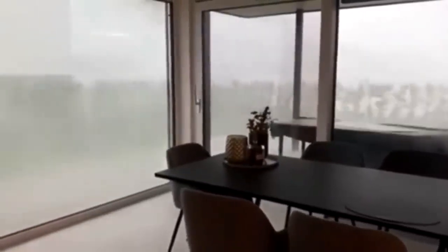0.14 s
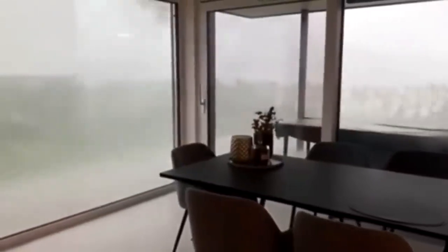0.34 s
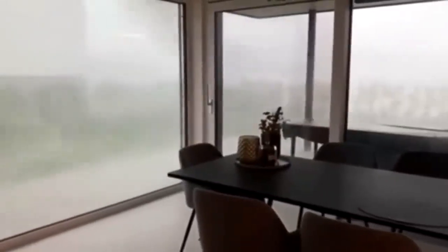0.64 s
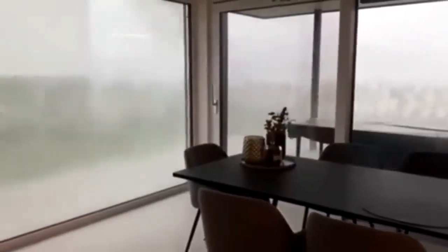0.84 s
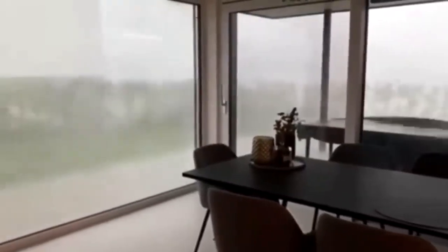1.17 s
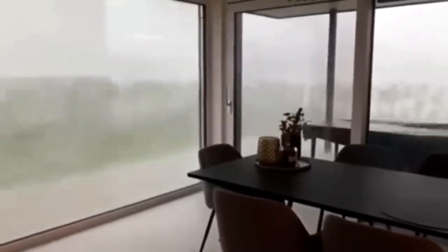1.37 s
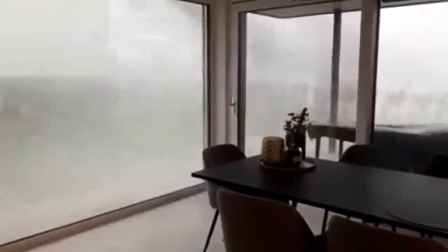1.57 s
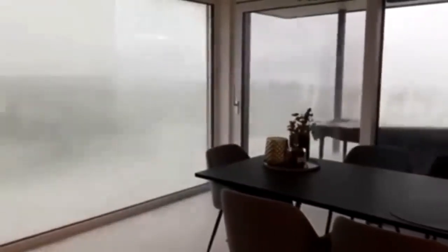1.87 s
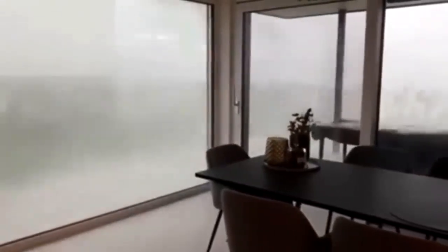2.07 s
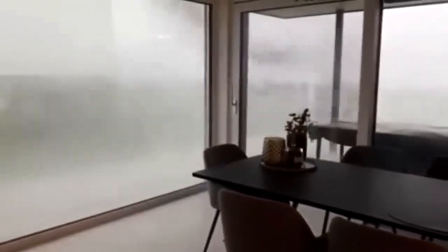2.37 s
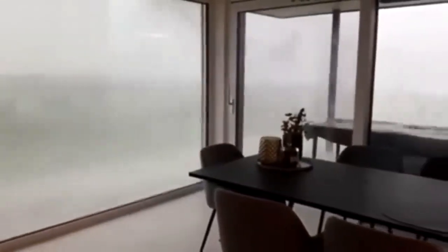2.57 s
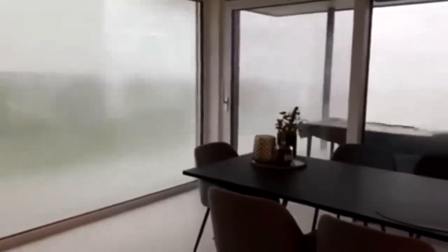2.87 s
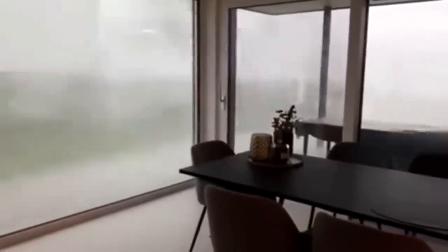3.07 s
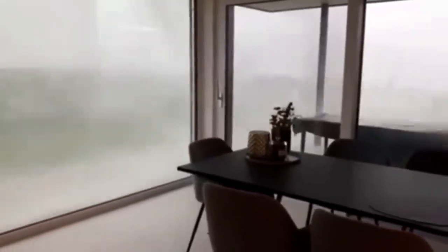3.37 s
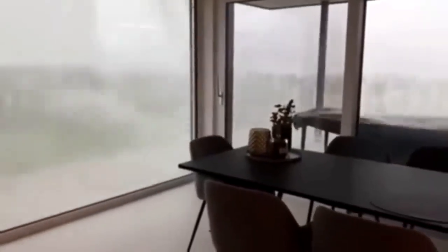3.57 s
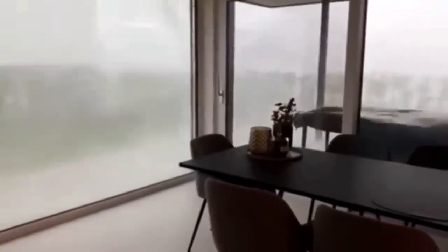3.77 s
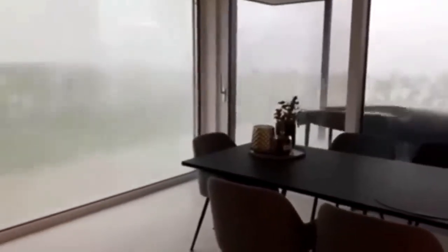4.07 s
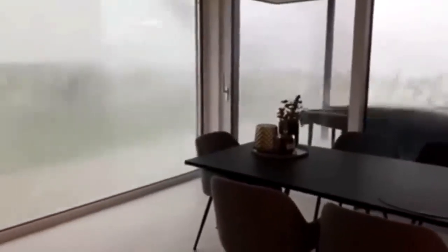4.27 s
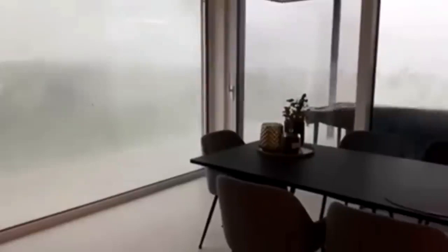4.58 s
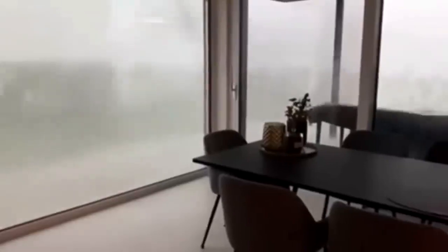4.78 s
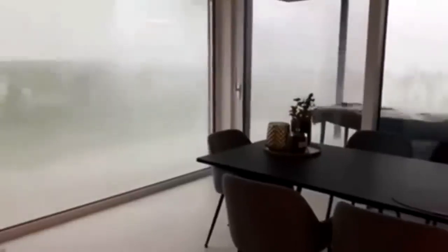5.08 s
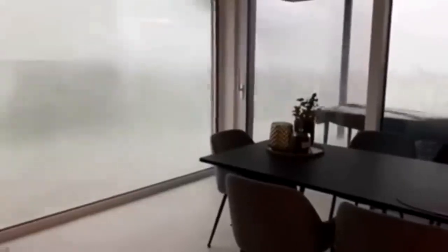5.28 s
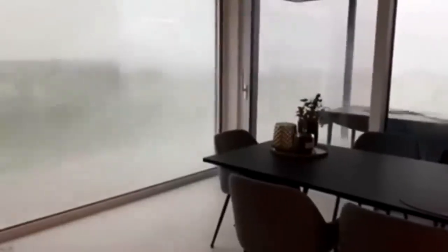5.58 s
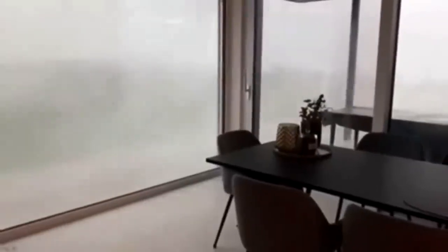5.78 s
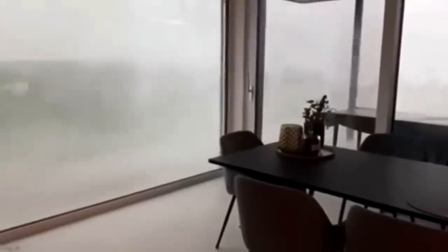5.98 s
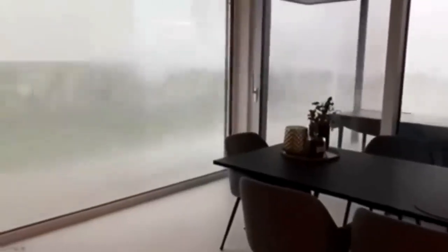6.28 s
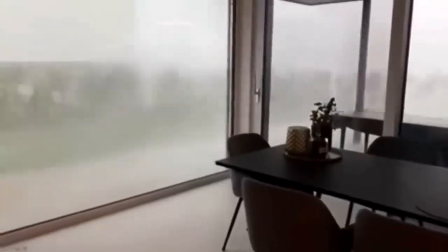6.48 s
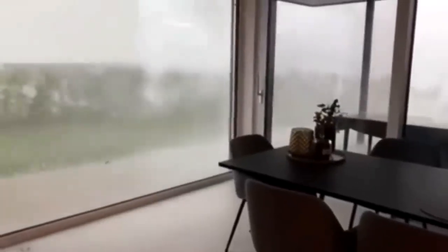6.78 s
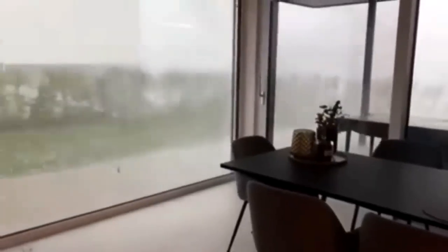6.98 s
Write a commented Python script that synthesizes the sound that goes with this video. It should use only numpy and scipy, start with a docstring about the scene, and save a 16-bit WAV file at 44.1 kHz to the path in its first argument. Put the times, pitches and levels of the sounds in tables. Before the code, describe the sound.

Storm heard from inside a room: deep wind roar and rumble against large windows, dense rain pattering and sheets of water slapping the glass.

```python
"""Storm on dining-room windows

Heard from inside: random drops patter and sizzle on the glass, timed sheets slap it, small clots spatter.
Filtered noise gives a deep rumble and a roar that rings low pane modes; air and fine spray rush past.
A gap moans once and short, faint noise ticks sound in the high treble. The rain and clots carry a short room tail.
"""
import sys
import numpy as np
from scipy import signal
from scipy.fft import rfft, irfft
from scipy.io import wavfile

SR = 44100
rng = np.random.default_rng(int(sys.argv[2]) if len(sys.argv) > 2 else 0)


def generate_wav(signal):
    """Clip the signal to [-1, 1] and save it as 16-bit WAV at the path in sys.argv[1]."""
    frames = np.transpose(np.atleast_2d(signal))
    scaled = np.clip(frames, -1, 1) * 32767
    pcm = np.round(scaled).astype(np.int16)
    wavfile.write(sys.argv[1], SR, pcm)


N = 314640
TIME = np.arange(N) / SR
BINS_HZ = np.maximum(np.arange(N // 2 + 1) * SR / N, 1)
FRAME = 512  # samples
ROOM_T60_S = 0.088
TOP_HZ = 11700
SPLIT_HZ = 2890  # heavy drops sound below this, fine ones above
BOOM_HZ = 205  # the deepest boom lies below this
RING_REST_HZ, RING_SINK_S = 2020, 0.053  # the ring of a sheet sinks to this pitch, with this time constant

# Level curves: only the departure from the curve's own mean is used, at times scaled by a depth.
# Heave of the whole glass front. Each row: time in seconds, level in dB.
HEAVE_CURVE = [(0.0, 0), (0.5, 0), (2.32, 3), (2.92, -1), (4.6, 3), (5.1, 0), (5.92, 1.5), (7.12, -1)]
# Push of the wind on the panes. Each row: time in seconds, level in dB.
WIND_CURVE = [(0.0, -23), (0.07, -26.5), (0.11, -28), (0.36, -27), (0.53, -29), (0.65, -23), (0.72, -29),
              (0.77, -22.5), (0.85, -25), (0.98, -30.5), (1.14, -25.5), (1.3, -28), (1.43, -24.5),
              (1.51, -28), (1.58, -23.5), (1.7, -25.5), (1.81, -31.5), (1.88, -26), (2.0, -35),
              (2.13, -26.5), (2.4, -25.5), (2.75, -27), (2.95, -26.5), (3.17, -28.5), (3.3, -26),
              (3.42, -25.5), (3.5, -22), (3.54, -28.5), (3.75, -25.5), (3.83, -30), (3.89, -22.5),
              (3.97, -21.5), (4.02, -27), (4.16, -23), (4.36, -23.5), (4.5, -26), (4.62, -26.5),
              (4.68, -22), (4.8, -25), (4.89, -25), (4.94, -25), (5.08, -25), (5.24, -23.5), (5.39, -31),
              (5.55, -28.5), (5.62, -24), (5.69, -29.5), (5.85, -24.5), (6.03, -27), (6.13, -23.5),
              (6.3, -22), (6.41, -29), (6.47, -23.5), (6.75, -23.5), (6.85, -26.5), (6.92, -24),
              (7.13, -24.5)]
# Deepest boom, relative to the rest of the roar. Each row: time in seconds, level in dB.
BOOM_CURVE = [(0.0, 0.5), (1.6, -2), (2.6, -0.5), (3.4, -1), (4.4, 0.5), (5.3, 0.5), (6.3, 1.5), (7.13, -3)]
# Rush of air and spray along the house front. Each row: time in seconds, level in dB.
RUSH_CURVE = [(0.0, -32), (0.14, -37.5), (0.25, -30), (0.42, -36.5), (0.8, -31), (0.92, -35), (1.35, -30.5),
              (1.51, -28.5), (1.76, -40), (1.87, -31), (2.0, -36), (2.33, -32), (2.7, -30.5), (3.03, -34.5),
              (3.14, -31), (3.78, -33.5), (3.92, -29.5), (4.33, -29.5), (4.55, -34), (4.73, -28.5),
              (4.87, -37.5), (5.07, -29.5), (5.43, -33), (5.8, -31.5), (6.05, -34), (6.13, -26.5),
              (6.2, -31), (6.27, -29.5), (6.39, -31.5), (6.51, -30), (7.13, -33.5)]
# Heavy rain thrown at the glass. Each row: time in seconds, level in dB.
RAIN_CURVE = [(0.0, -30), (0.12, -33.5), (0.25, -30), (0.51, -32), (0.61, -31), (0.7, -33), (0.95, -30),
              (1.42, -28), (1.5, -28.5), (1.62, -28), (1.77, -32.5), (1.86, -28.5), (1.93, -31),
              (2.47, -27.5), (2.92, -29), (3.02, -31.5), (3.12, -30), (3.42, -28), (3.68, -28.5),
              (3.78, -31), (3.86, -28.5), (4.3, -27), (4.5, -30), (4.7, -25.5), (4.85, -29), (5.05, -26.5),
              (5.28, -28.5), (5.4, -32.5), (5.82, -27.5), (6.0, -28), (6.13, -25.5), (6.29, -28),
              (6.38, -31), (6.47, -25.5), (6.65, -26), (7.02, -30.5), (7.13, -25.5)]
# Treble sizzle of fine drops. Each row: time in seconds, level in dB.
SIZZLE_CURVE = [(0.0, -38.5), (0.14, -45.5), (0.24, -41), (0.5, -45.5), (0.57, -40), (0.72, -41.5),
                (0.77, -38.5), (0.86, -41.5), (1.05, -41), (1.4, -40), (1.46, -38), (1.56, -41),
                (1.78, -41.5), (2.0, -43), (2.5, -38.5), (2.78, -40), (3.02, -44), (3.15, -40.5),
                (3.42, -41), (3.68, -40.5), (3.75, -44.5), (3.84, -38), (4.03, -40.5), (4.32, -36),
                (4.42, -42.5), (4.7, -37), (4.92, -40.5), (5.03, -38.5), (5.42, -44.5), (5.83, -38),
                (5.98, -43), (6.12, -37), (6.27, -38.5), (6.37, -42.5), (6.55, -37.5), (7.13, -44)]

# Spectra, relative: the overall level is set elsewhere.
# Deep rumble. Each row: frequency in Hz, gain in dB.
RUMBLE_SPECTRUM = [(15, -18), (30, -16), (40, -4.5), (54, 1.5), (75, 6.5), (92, 3), (115, 4.5),
                   (200, -12.5), (600, -44), (2000, -84)]
# Roar of the panes without their modes. Each row: frequency in Hz, gain in dB.
ROAR_SPECTRUM = [(60, -44), (105, -12), (140, -3), (300, -1), (420, -2), (560, -4.5), (800, -10.5),
                 (1200, -29.5), (2500, -36), (8000, -74)]
# Low modes of the panes and the room. Each row: frequency in Hz, width in Hz, lift in dB.
LOW_MODES = [(122, 8, 5), (154.3, 6, 9.5), (175.8, 8.3, 6), (208.7, 11, 3.5), (237, 13, 4), (257, 8.6, 4),
             (295, 26.5, 6), (346, 10.6, 4.5), (393, 30, 1.5), (428, 13, 3.5), (521, 11, 2.5), (584, 18, 3),
             (717, 26, 7)]
# Air and spray dulled by the glass. Each row: frequency in Hz, gain in dB.
SPRAY_SPECTRUM = [(200, -40), (450, -4.5), (650, -0.5), (850, 4.5), (1050, -0.5), (1500, -7.5), (1900, -19),
                  (3000, -33), (6000, -54), (12000, -77)]
# Glass passes most just above 2 kHz, where its bending waves match the sound in air.
# Each row: frequency in Hz, gain in dB.
GLASS_RESPONSE = [(400, -48), (1200, -5.5), (1650, -4.5), (1900, -2), (2070, 1.5), (2350, 0), (2850, 0.14),
                  (3300, -4.5), (4000, -6.7), (4800, -12), (5800, -17.5), (7500, -28), (10500, -41),
                  (12500, -43.5)]
# Correlation of left and right by frequency. Each row: frequency in Hz, correlation from -1 to 1.
STEREO_LIKENESS = [(40, .985), (110, .96), (190, .86), (310, .64), (430, .5), (520, .15), (900, .25),
                   (1600, 0), (2200, .3), (3000, .33), (4300, .7), (5500, -.2), (7300, .9), (8900, -.85),
                   (10200, .85)]

# Moan of the wind in a gap. Each row: time in seconds, pitch in Hz, relative level in dB.
HOWL_TRACK = [(1.36, 390, -20), (1.45, 460, 1), (1.53, 535, 0), (1.68, 595, -1.5), (1.8, 510, -1),
              (1.91, 420, 4), (2.0, 350, -22)]
# Short, faint high-treble noise ticks. Each row: start in seconds, relative level in dB before the band filter.
TREBLE_TICKS = [(1.009, -48), (1.44, -51), (2.612, -66), (2.749, -62), (3.238, -41), (3.419, -44),
                (4.278, -45), (4.759, -48), (6.559, -51)]
# Sheets of water slapping the glass.
# Each row: time in seconds, relative level in dB, initial ring pitch in Hz, length before the decay in seconds.
WATER_SHEETS = [(0.205, -20.5, 3020, .018), (0.277, -23.5, 2600, .03), (0.429, -21, 2480, 0.038),
                (0.539, -20, 3100, 0.034), (0.745, -16.5, 3040, 0.028), (0.988, -22, 2650, 0.02),
                (1.319, -19.5, 2700, .045), (1.438, -16, 2900, 0.046), (1.523, -22.5, 2350, 0.028),
                (1.797, -22, 2300, 0.021), (2.513, -22, 2830, 0.082), (2.771, -20, 2390, 0.037),
                (3.314, -22, 2610, 0.036), (3.417, -17, 2600, 0.023), (3.823, -22.5, 2830, 0.014),
                (3.883, -20.5, 2750, .015), (4.26, -22, 3170, 0.013), (4.335, -27, 2850, 0.014),
                (4.531, -21, 2650, 0.013), (4.627, -17, 3600, 0.049), (4.764, -20.5, 2700, 0.015),
                (5.266, -18, 2500, 0.02), (5.766, -22.5, 2920, .045), (6.061, -25, 3000, .04),
                (6.265, -20.5, 2900, 0.02), (6.488, -19.5, 2860, 0.035), (6.647, -23, 2650, 0.015),
                (6.786, -19, 2480, 0.07), (7.08, -23, 2470, 0.015)]


def undb(db):
    """Decibels to gain."""
    return 10 ** (np.asarray(db) / 20)


def unit(x):
    """Scale to rms 1."""
    return x / np.sqrt(np.mean(x ** 2))


def across(points):
    """(Hz, value) points joined on a log-frequency axis."""
    hz, value = np.transpose(points)
    return np.interp(np.log(BINS_HZ), np.log(hz), value)


def colour(x, db):
    """Filter by a gain in dB per frequency bin; rms 1."""
    return unit(irfft(rfft(x) * undb(db), N))


def walk(rate_hz):
    """Smooth random curve: noise with a Gaussian low-pass; rms 1."""
    return unit(irfft(rfft(rng.standard_normal(N)) * np.exp(-(BINS_HZ / rate_hz) ** 2), N))


def swell(table):
    """Departure of a level curve from its own mean, in dB, at each sample."""
    when, db = np.transpose(table)
    level = np.interp(TIME, when, db)
    return level - level.mean()


def add(out, x, start_s):
    """Mix in a short sound at its start time."""
    i = max(int(start_s * SR), 0)
    out[:, i:i + x.shape[1]] += x[:, :max(N - i, 0)]


def drops(per_s, spread_db, size=N):
    """Two streams of random impacts, rms 1: many small drops, a few heavy ones."""
    hits = rng.random((2, size)) < per_s / SR
    weight = undb(spread_db * np.minimum(rng.exponential(size=(2, size)), 4))
    return unit(hits * weight * rng.choice([-1, 1], (2, size)))


def patches(x, depth_db, width_hz, last_s, size):
    """Wind and rain wander over spots that favour other bending modes: the colour shifts in patches."""
    hz, t, frames = signal.stft(x, SR, nperseg=size)
    field = rng.standard_normal((len(hz), len(t)))
    for axis, span in enumerate([width_hz / hz[1], last_s / t[1]]):
        blur = np.exp(-(np.arange(-30, 31) / span) ** 2)
        field = signal.fftconvolve(field, np.expand_dims(blur, 1 - axis), "same")
    shift_db = depth_db * 2 * np.tanh(unit(field) / 2)  # soft limit
    return signal.istft(frames * unit(undb(shift_db)), SR)[1][:, :N]


def room(x, wet_db):
    """Direct sound plus a dense tail from glass walls and bare floor; each call is a new place."""
    t = TIME[:SR // 3]
    decay = np.exp(-np.log(1000) * t / ROOM_T60_S) * (t > .004)
    tail = rng.standard_normal((2, len(t))) * decay
    tail /= np.sqrt(np.sum(tail ** 2, axis=1, keepdims=True))
    wet = signal.oaconvolve(x, tail, axes=1)[:, :x.shape[1]]
    return (x + undb(wet_db) * wet) / np.hypot(1, undb(wet_db))


def stereo(pair):
    """Two unrelated streams become sum and difference, weighted for the set left-right correlation."""
    alike = np.clip(across(STEREO_LIKENESS), -.99, .99)
    mid, side = irfft(rfft(pair) * np.sqrt([(1 + alike) / 2, (1 - alike) / 2]), N)
    return np.array([mid + side, mid - side])


def lean(pair, left_db):
    """Raise the left over the right by left_db."""
    return pair * undb(np.array([[left_db], [-left_db]]) / 2)


def rumble(level_db, heave_depth):
    """Low-frequency noise: the whole glass front heaves slowly, at its own pace."""
    noise = colour(rng.standard_normal((2, N)), across(RUMBLE_SPECTRUM))
    return noise * undb(level_db + heave_depth * swell(HEAVE_CURVE))


def roar(level_db, gust_depth, buffet_db):
    """Eddies buffet the panes and ring their low modes, now these, now those; the deepest boom has its own curve."""
    eddies = rng.standard_normal((2, N)) * undb(buffet_db * walk(49))
    modes_db = sum(db / (1 + (2 * (BINS_HZ - hz) / width) ** 2) for hz, width, db in LOW_MODES)
    panes = colour(eddies, across(ROAR_SPECTRUM) + modes_db)
    panes = patches(panes, depth_db=1.36, width_hz=25, last_s=0.092, size=4096)
    deep = irfft(rfft(panes) / (1 + (BINS_HZ / BOOM_HZ) ** 10), N)
    balanced = panes - deep + deep * undb(swell(BOOM_CURVE))
    return balanced * undb(level_db + gust_depth * swell(WIND_CURVE))


def spray(level_db, rush_depth, flutter_db):
    """Air and fine spray rush along the house front, dulled by the glass."""
    mist = colour(drops(per_s=7000, spread_db=2.5), across(SPRAY_SPECTRUM))
    mist = patches(mist, depth_db=2.5, width_hz=40, last_s=0.042, size=2048)
    return mist * undb(level_db + rush_depth * swell(RUSH_CURVE) + flutter_db * walk(29))


def howl(level_db, width_hz):
    """The wind moans once in a gap of the frame: an unsteady tone whose pitch rises and falls."""
    when, hz, db = np.transpose(HOWL_TRACK)
    phase = 2 * np.pi * np.cumsum(np.interp(TIME, when, hz)) / SR
    wobble = (walk(width_hz) * np.cos(phase) + walk(width_hz) * np.sin(phase)) / 2
    envelope_db = np.interp(TIME, when, db, left=-100, right=-100)
    return (np.sin(phase) + wobble) * undb(level_db + envelope_db)


def ticks(centre_hz, width_hz, fall_s):
    """Short, faint high-treble noise ticks: decaying noise in a Gaussian band."""
    out, age = np.zeros((2, N)), TIME[:SR // 10]
    for start_s, db in TREBLE_TICKS:
        tick = rng.standard_normal((2, len(age))) * np.exp(-age / fall_s) * undb(db)
        add(out, tick, start_s)
    return irfft(rfft(out) * np.exp(-((BINS_HZ - centre_hz) / width_hz) ** 2), N)


def spatters(level_db, per_s, spread_db, fall_s, wet_db):
    """Small clots of water burst on the glass at random, each a tight cluster of drops."""
    energy = drops(per_s, spread_db)[0] ** 2
    bursts = signal.oaconvolve(energy, np.exp(-TIME[:SR // 10] / fall_s))[:N]
    clusters = drops(per_s=3000, spread_db=2.0) * np.sqrt(np.abs(bursts))
    glass = colour(room(clusters, wet_db), across(GLASS_RESPONSE))
    glass = patches(glass, depth_db=6.0, width_hz=340, last_s=0.019, size=FRAME)
    return glass * undb(level_db + swell(RAIN_CURVE))


def sheets(level_db, rise_s, fall_s, ring_db, ring_width_hz, tilt_db, broaden):
    """Each sheet is a dense, fading volley with a sinking ring; a harder one covers more glass and rings less."""
    out, age = np.zeros((2, N)), TIME[:SR // 4]
    usual_db = np.mean([row[1] for row in WATER_SHEETS])
    for start_s, db, ring_hz, length_s in WATER_SHEETS:
        volley = (1 - np.exp(-age / rise_s)) * np.exp(-np.maximum(age - length_s, 0) / fall_s)
        impacts = drops(per_s=7000, spread_db=2.5, size=len(age))
        hz, t, frames = signal.stft(impacts, SR, nperseg=FRAME)
        centre_hz = RING_REST_HZ + (ring_hz - RING_REST_HZ) * np.exp(-t / RING_SINK_S)
        glass_db = np.interp(hz, *np.transpose(GLASS_RESPONSE)) + tilt_db * np.log2(hz + 1)  # tilt per octave
        peak_db = ring_db - broaden * (db - usual_db)
        resonance_db = peak_db / (1 + (2 * (hz[:, None] - centre_hz) / ring_width_hz) ** 2)
        hits = signal.istft(frames * undb(glass_db[:, None] + resonance_db), SR)[1][:, :len(age)]
        add(out, unit(hits) * volley * undb(db + level_db), start_s - rise_s)
    return out


def patter(flow_db, tone_db, per_s, spread_db, flurry_db, wet_db, count=4):
    """Drops hit each of count panes in flurries of its own; harder rain brings more of them."""
    mean_db = np.mean(flow_db)
    flow = undb(flow_db - mean_db) ** 2
    panes = np.zeros((2, N))
    for _ in range(count):
        rate_per_s = per_s / count * flow * undb(flurry_db * walk(30)) ** 2
        panes += room(drops(rate_per_s, spread_db), wet_db)
    return colour(panes, across(GLASS_RESPONSE) + tone_db) * undb(mean_db) * np.sqrt(np.mean(flow))


def rain(heavy_db, heavy_depth, fine_db, fine_depth):
    """Heavy drops sound duller; fine ones sizzle, with more room tail: two bands, each with its own flow."""
    steep = (BINS_HZ / SPLIT_HZ) ** 10
    low_db, high_db = -10 * np.log10(1 + steep), -10 * np.log10(1 + 1 / steep)
    heavy_flow_db = heavy_db + heavy_depth * swell(RAIN_CURVE)
    fine_flow_db = fine_db + fine_depth * swell(SIZZLE_CURVE)
    heavy = patter(heavy_flow_db, low_db, per_s=4200, spread_db=2.0, flurry_db=1.0, wet_db=0.0)
    fine = patter(fine_flow_db, high_db, per_s=3800, spread_db=3.0, flurry_db=1.5, wet_db=5.0)
    return patches(heavy + fine, depth_db=3.0, width_hz=80, last_s=0.018, size=FRAME)


def scene():
    """Roar, rush and ticks lean left; the moan is central; the water is spread without a lean."""
    heave = stereo(rumble(level_db=-38.5, heave_depth=1.0))
    boom = lean(stereo(roar(level_db=-25.0, gust_depth=0.91, buffet_db=0.86)), left_db=0.6)
    rush = lean(stereo(spray(level_db=-31.5, rush_depth=0.91, flutter_db=1.04)), left_db=1.0)
    moan = howl(level_db=-37, width_hz=20)
    treble = lean(ticks(centre_hz=9700, width_hz=3900, fall_s=0.0097), left_db=3)
    clots = spatters(level_db=-35.0, per_s=34, spread_db=2.0, fall_s=0.0057, wet_db=-3.0)
    slaps = sheets(level_db=-7.0, rise_s=.004, fall_s=0.027, ring_db=12.5, ring_width_hz=410,
                   tilt_db=-0.8, broaden=1.0)
    downpour = rain(heavy_db=-30.0, heavy_depth=0.83, fine_db=-33.5, fine_depth=0.85)
    water = stereo(downpour + slaps + clots)
    return heave + boom + rush + moan + treble + water


def record(dry):
    """Steep elliptic low-pass at TOP_HZ."""
    return signal.sosfilt(signal.ellip(10, .2, 80, TOP_HZ, fs=SR, output="sos"), dry)


dry = scene()
out = record(dry)
generate_wav(out)
```